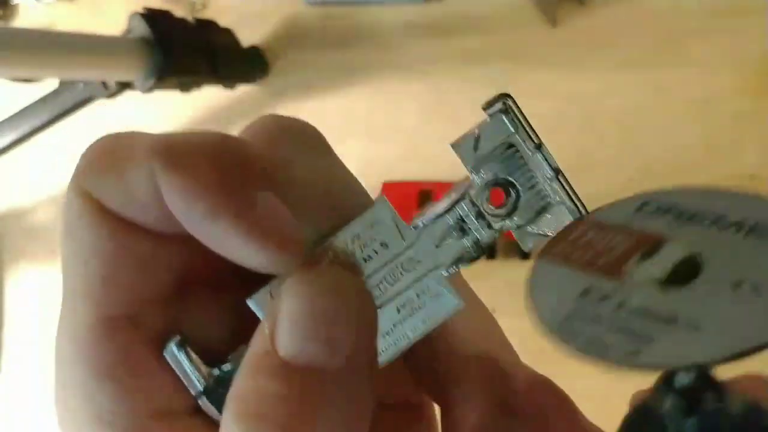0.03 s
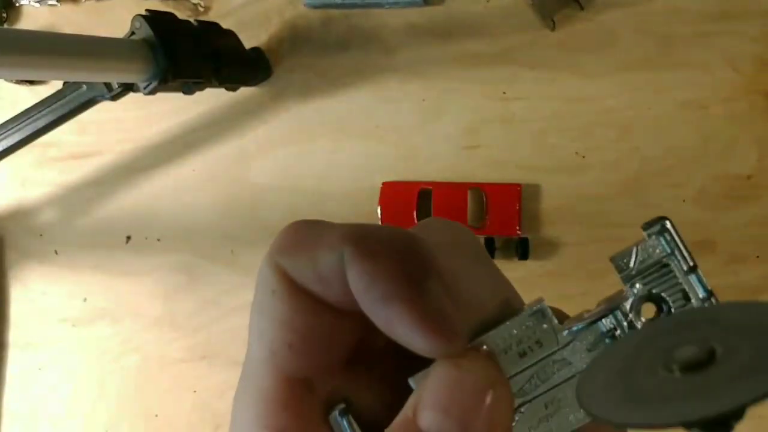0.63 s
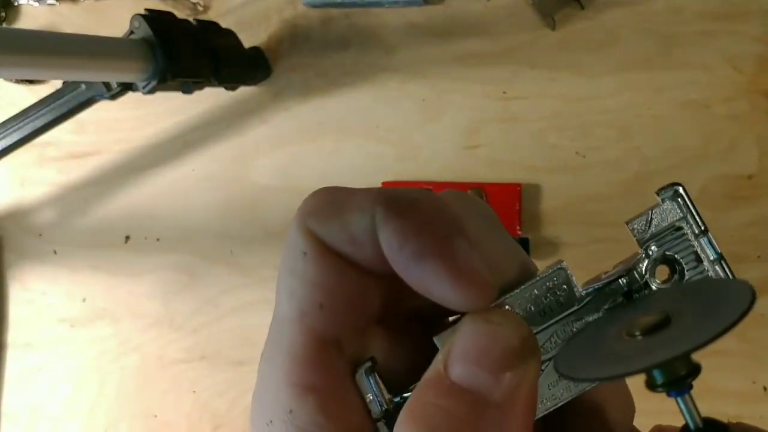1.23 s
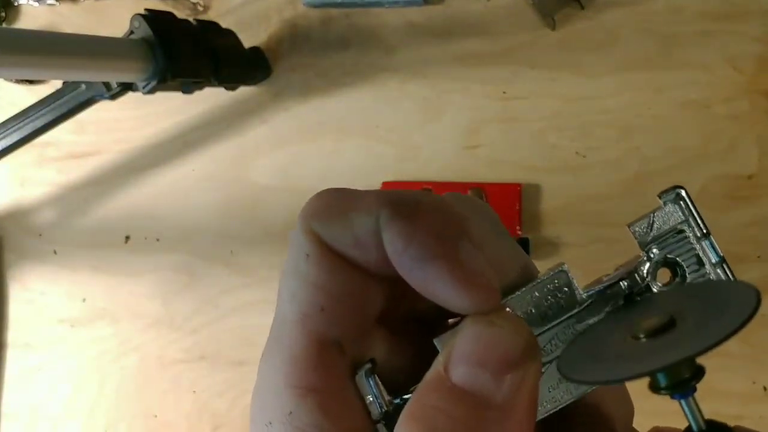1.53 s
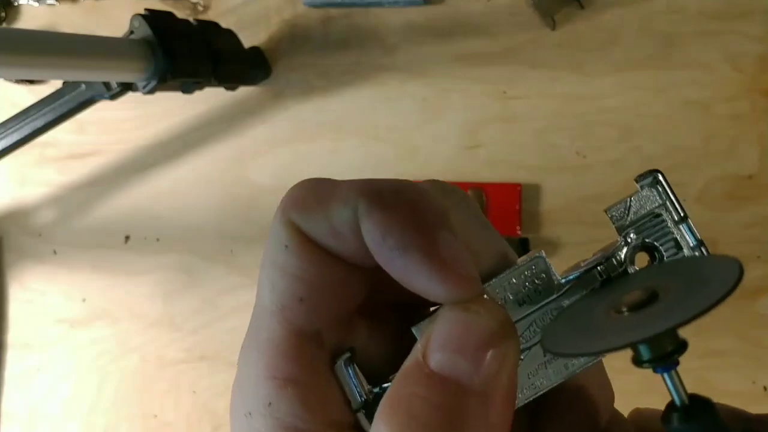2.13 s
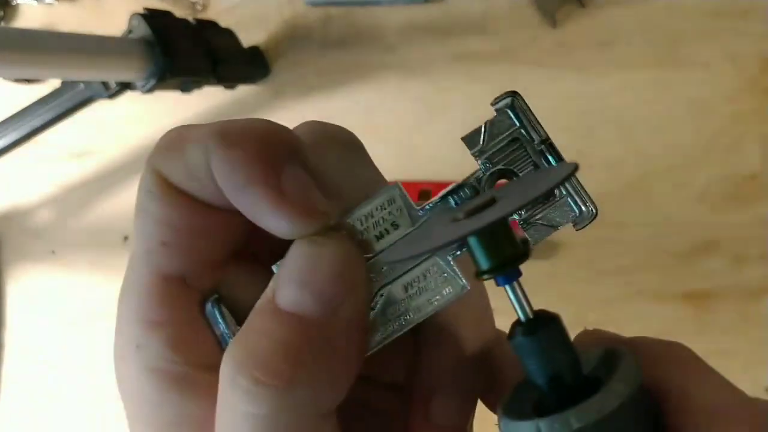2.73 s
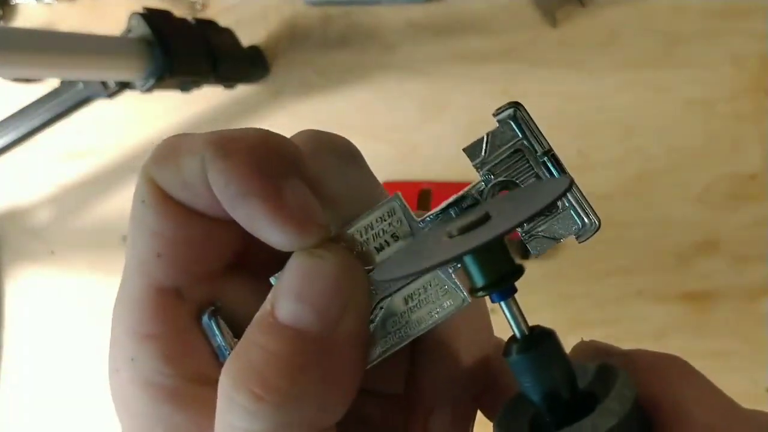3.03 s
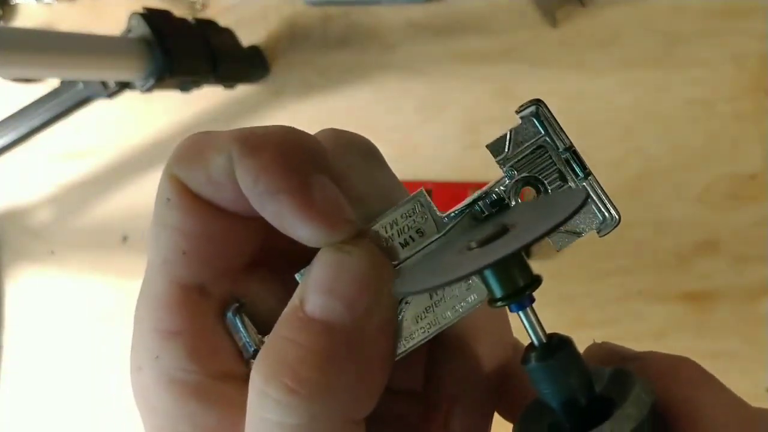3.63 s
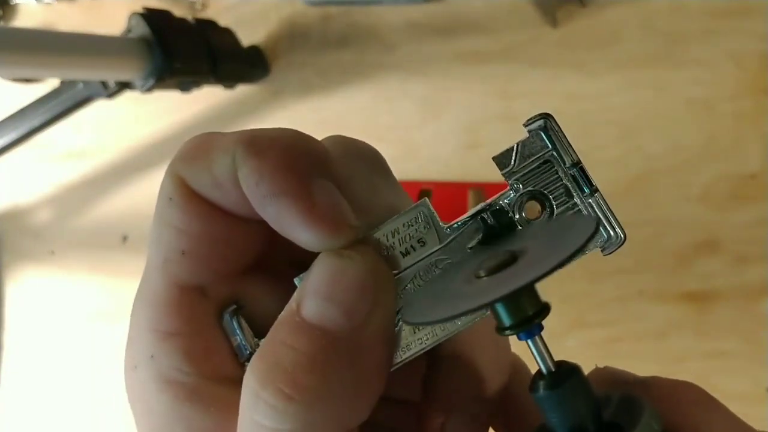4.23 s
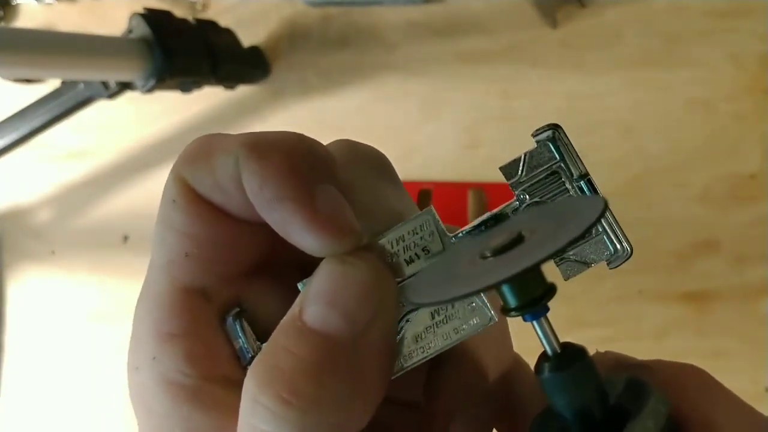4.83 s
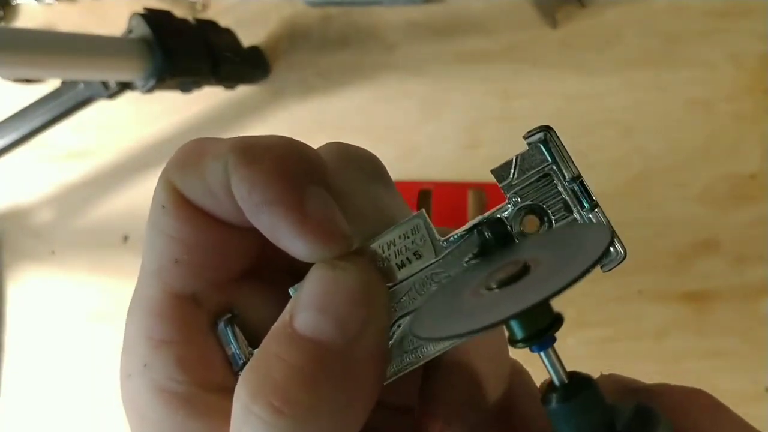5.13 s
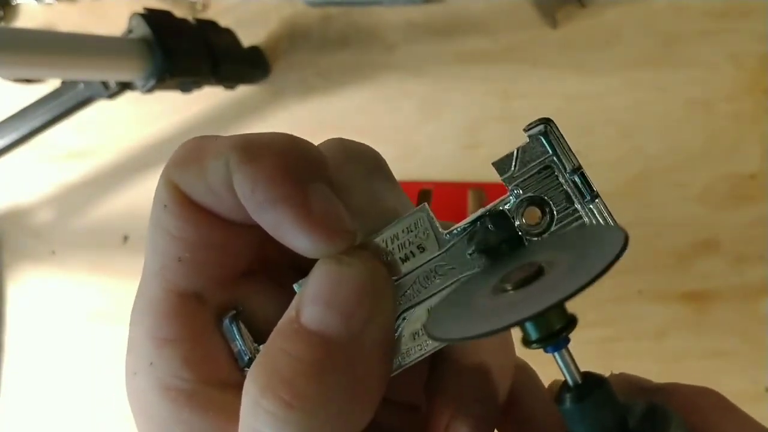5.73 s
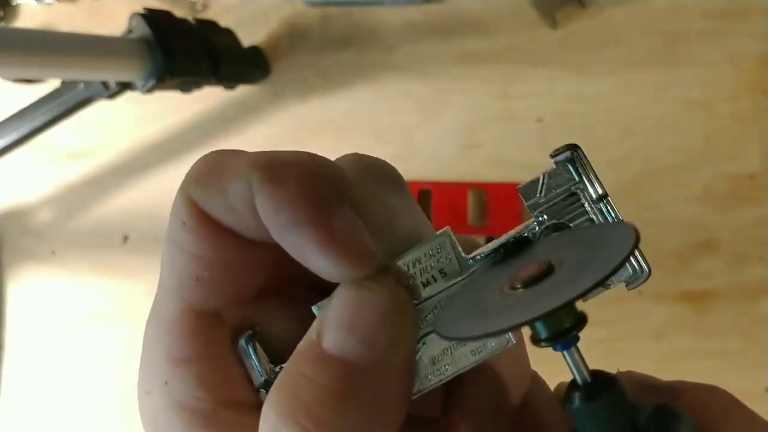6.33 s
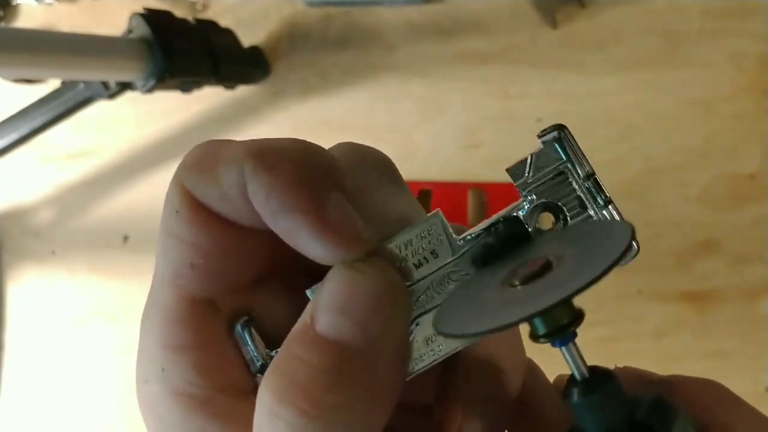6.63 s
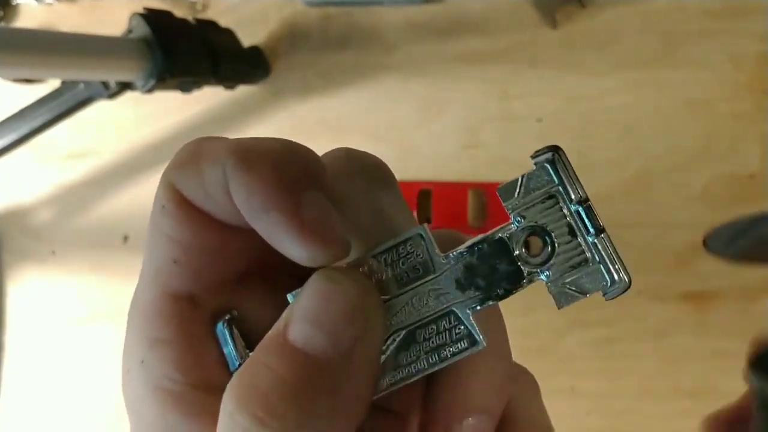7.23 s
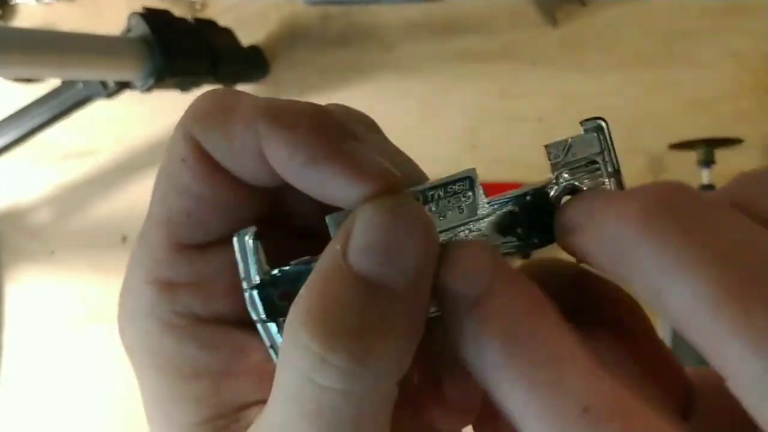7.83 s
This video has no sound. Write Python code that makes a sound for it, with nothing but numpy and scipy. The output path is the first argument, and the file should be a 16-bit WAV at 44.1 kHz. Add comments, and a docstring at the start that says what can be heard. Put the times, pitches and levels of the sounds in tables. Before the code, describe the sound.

A quiet workshop with a faint low rumble is heard through a stereo microphone pair close to a wooden bench. At about 0.3 seconds a small rotary tool clicks on, gives a brief high whistle and spins up, settling by one second into a hum with a whine and an airy hiss. From about 1.3 seconds its cutting disc touches a plastic toy part in short, gritty rasps. From around 3 to 7 seconds the presses come longer and closer together, with sizzling, sharp scrapes and high squeals. The motor's pitch sags under each press, most deeply between 5 and 7 seconds, and the overall level keeps dipping abruptly and swelling back. The tool runs free for a moment, then clicks off at about 7.4 seconds and stops at once. A few quick knocks follow between 7.6 and 7.8 seconds as it is put down on the bench.

```python
"""A quiet workshop, a stereo microphone pair close to the wooden bench. A small rotary tool clicks on,
whistles briefly and spins up: its unbalance hums, its three poles whine, its brushes hiss.
The cutting disc is pressed again and again on a plastic toy part: the grit rasps, the rim sizzles,
the part squeals and the speed sags; the level keeps dipping and swelling back.
At last the tool is switched off and knocks down on the bench."""
import sys
import numpy as np
from scipy import signal
from scipy.fft import rfft, irfft
from scipy.io import wavfile
from scipy.ndimage import map_coordinates

SR = 44100
rng = np.random.default_rng(int(sys.argv[2]) if len(sys.argv) > 2 else 0)


def inscribe(sig):
    """Save sig as 16-bit PCM at rate SR to the path in sys.argv[1].

    A 1-D sig is mono; a 2-D sig holds one channel per row.
    Samples are clipped to [-1, 1] before scaling.
    """
    pcm = np.round(np.clip(np.atleast_2d(sig).T, -1, 1) * 32767)
    wavfile.write(sys.argv[1], SR, pcm.astype(np.int16))


N = 352800
T = np.arange(N) / SR
HZ = np.fft.rfftfreq(N, 1 / SR)
ON_S, OFF_S, FREE_SPEED_HZ = .315, 7.38, 375.2

# room tone of the workshop: (frequency [Hz], level [dB])
ROOM_TONE = [(18, -52), (30, -20.5), (112, -13), (245, -3.5), (345, 0), (384, -3), (512, -2), (740, -5),
             (913, -11.5), (1350, -16.5), (2170, -33.5), (3100, -33.5), (4300, -43), (5300, -41.5),
             (7100, -43.5), (7670, -36), (8400, -49), (16000, -48)]
# room tone unique to each microphone, against what both share: (frequency [Hz], level [dB])
ROOM_SPREAD = [(100, 10.0), (400, 3), (1200, 3.5), (3000, 11.5)]
# how far the left microphone leads the right: (frequency [Hz], phase [rad])
LEFT_LEAD = [(1400, 0), (2200, 3.1), (2900, 5.5), (3700, 6.7), (4400, 9), (5400, 11.4), (7000, 15.7),
             (10600, 26), (13000, 31.6), (14100, 34.5), (15300, 38.5)]
# left microphone against the right: (frequency [Hz], level [dB])
LEFT_BALANCE = [(120, 7), (200, 8), (350, 9), (520, 3.5), (1150, 0), (1900, -5.5), (2800, 1.5), (4400, 0),
                (7300, 4.5), (10000, 5.5), (15000, -3)]
# abrupt dips in level, mostly at a hard bite: (time [s], depth [dB])
LEVEL_DIPS = [(0.743, -20), (1.337, -12), (1.403, -18.5), (1.649, -20), (2.023, -15), (2.13, -16.5),
              (2.48, -15.5), (2.905, -12), (3.0, -13), (3.24, -14), (3.419, -15.5), (3.689, -17.5),
              (3.869, -18.5), (4.225, -15.0), (4.441, -12), (4.629, -15.5), (4.78, -15), (5.09, -18),
              (5.199, -16), (5.349, -14.5), (5.6, -17.5), (5.87, -16.5), (6.03, -14.5), (6.169, -13),
              (6.32, -12.5), (6.46, -11.5), (6.58, -10.5), (6.759, -13), (6.965, -20.5)]
# switch clicks and knocks on the bench: (time [s], ring [dB], click [dB], thud [dB])
BLOWS = [(0.236, -64, -36, -68), (0.3146, -35, -22.5, -52), (0.494, -22.5, -43, -53),
         (7.374, -22, -22.5, -48), (7.6242, -15.5, -29.5, -53), (7.688, -28, -24, -32.5),
         (7.693, -14, -30, -44), (7.769, -15.5, -36, -33), (7.774, -31, -33.5, -41)]
# modes of the struck housing: (frequency [Hz], level [dB], t60 [s])
HOUSING_MODES = [(1035, 0, 0.017), (1190, -24, 0.048), (794, -25, 0.031), (3500, -42, .025)]
# dry click of a blow: (frequency [Hz], level [dB])
CLICK_SPECTRUM = [(150, -37), (700, -33), (1100, 7), (1900, 9.5), (3100, 7.5), (4300, -3), (5400, 1.5),
                  (7000, -8.5), (16000, -20)]
# dull thud of the bench: (frequency [Hz], level [dB])
THUD_SPECTRUM = [(40, -22), (70, -14), (120, -6.5), (260, -4), (650, -11.0), (1500, -21), (5000, -47)]
# the motor starts: (time [s], brush scrape [dB], speed control whistle [dB], commutator chirp [dB])
START_LEVELS = [(.315, -70, -80, -95), (.325, -57.5, -51, -92), (.42, -48.5, -56, -70),
                (.455, -42.5, -51, -64), (.5, -51, -48, -52), (.55, -65, -52, -65), (.6, -52, -52, -50),
                (.66, -43, -55, -59), (.745, -62, -93, -72)]
# lines of the motor's hum: (multiple of shaft speed, level [dB])
HUM_LINES = [(1, 1.5), (2, -16.5), (4, -13.5), (5, -13.5), (6, -7), (7, -10), (9, -9), (10, -13.5),
             (12, -16.5), (15, -35), (18, -10.5), (21, -11), (22, -21), (23, -31), (24, -10), (27, -14.5),
             (30, -11.5), (33, -13.5), (36, -19), (40, -40), (42, -34)]
# casing resonances that lift a line sweeping through: (frequency [Hz], width [Hz], lift [dB])
CASING_RESONANCES = [(740, 70, 6), (1590, 130, 11), (2235, 70, 6), (3150, 160, 5), (3355, 70, 8),
                     (4485, 90, 22), (7840, 200, 5), (8950, 130, 4), (13420, 220, 11)]
# the housing's response to the whine of the poles: (frequency [Hz], level [dB])
WHINE_RESPONSE = [(600, -65.5), (850, -49), (920, -46.5), (960, -41.5), (1020, -34.5), (1070, -36.5),
                  (1120, -35.5)]
# brushes and cooling air: (frequency [Hz], level [dB])
BRUSH_SPECTRUM = [(60, -30), (280, -37), (500, -23.5), (750, -9), (1100, -1), (1800, -10), (2700, -1.5),
                  (3400, -8), (4200, -9), (5500, -8.5), (7300, -14), (8400, -10.5), (9600, -20.5),
                  (16000, -18.5)]
# the rim catches an edge: (time [s], length [s], scrape [dB], screech [dB])
EDGE_CATCHES = [(1.391, 0.031, -32, -55), (1.567, 0.066, -38, -55), (1.821, 0.019, -33, -50),
                (2.006, 0.047, -29.5, -49), (2.107, 0.024, -27.5, -50), (2.264, 0.019, -32, -53),
                (2.476, .015, -30.5, -52), (2.558, 0.025, -26.5, -55), (2.612, 0.02, -30.5, -55),
                (2.995, .019, -25, -30.5), (3.095, 0.016, -36, -32.5), (3.15, 0.013, -44, -33),
                (3.244, 0.011, -27, -35), (3.297, 0.029, -35, -32), (3.418, 0.015, -42, -29),
                (3.515, 0.02, -36, -36), (3.639, .018, -29, -48), (3.843, 0.056, -32, -32),
                (4.218, 0.021, -32, -44), (4.326, 0.028, -43, -34), (4.739, 0.017, -30.5, -31),
                (4.784, 0.046, -30, -31), (4.825, .03, -31, -46), (5.556, 0.02, -44, -31),
                (6.229, 0.022, -41, -32), (6.302, 0.019, -32, -40), (6.654, 0.021, -42, -43),
                (6.758, 0.023, -28.5, -29.5), (6.968, 0.028, -23.5, -45)]
# scrape of a caught edge: (frequency [Hz], level [dB])
SNAG_SPECTRUM = [(100, -38), (350, -5), (600, -19), (1000, -8), (2300, -8), (4300, -13), (5300, -6.5),
                 (6800, -3.5), (9000, -2.5), (10600, -13), (16000, -4.5)]
# the part's strongest resonance: (frequency [Hz], level [dB])
SQUEAL_SPECTRUM = [(3000, -61), (4500, -10), (5000, -7.5), (5350, -2), (5700, -14.5), (6200, -21.5),
                   (7000, -7), (9000, -46)]
# the plastic part under the disc: (frequency [Hz], level [dB])
PLASTIC_SPECTRUM = [(200, -33), (650, -26.5), (980, -1.5), (1300, -10.5), (1620, -8), (2300, -11),
                    (4600, -14), (5300, -3.5), (6100, -11.5), (7400, -1.5), (9600, -20), (10600, -5.5),
                    (11700, -17.5), (16000, -22.5)]
# ring of the disc's rim: (frequency [Hz], level [dB])
RIM_SPECTRUM = [(300, -103), (9000, -18.5), (12500, -24.5), (13400, -19.5), (14000, -56), (14500, -15.5),
                (15300, -8), (15800, -19), (17000, -28)]
# the disc is pressed on the part; load is the sag in speed it would settle at:
# (time [s], length [s], load [Hz], rasp [dB], squeal [dB], sizzle [dB])
DISC_PRESSES = [(1.336, 0.135, 13, -33.5, -51, -34), (1.572, 0.095, 40.4, -32, -55, -27),
                (1.817, 0.115, 14.6, -37.5, -39.5, -40.5), (1.967, 0.075, 54.4, -38, -49, -38),
                (2.098, 0.095, 24, -34, -51, -46), (2.252, 0.05, 16, -43, -62, -44),
                (2.557, 0.075, 19.4, -41, -58, -45), (2.903, 0.26, 24.3, -35.5, -36.5, -37),
                (3.19, 0.1, 17.5, -40.5, -46, -48), (3.351, 0.33, 27.3, -41.5, -39.5, -38.5),
                (3.7, 0.11, 30, -30, -43, -36), (3.815, 0.1, 44.6, -29, -35, -40),
                (4.213, 0.26, 36.3, -36.5, -32, -36.5), (4.488, 0.23, 27.4, -38, -44, -34.5),
                (4.747, 0.12, 26, -31.5, -34, -39), (5.085, 0.205, 77, -28.5, -30, -30),
                (5.285, 0.075, 31.7, -33, -37.5, -46), (5.553, 0.165, 71, -33, -35, -32.5),
                (5.731, 0.17, 72, -31.5, -39, -35), (5.9, 0.11, 40.4, -32, -42, -34.5),
                (6.072, 0.12, 17.5, -35, -43, -44), (6.208, 0.22, 81, -33.5, -41.5, -43),
                (6.448, 0.13, 67, -31.5, -45, -40), (6.599, 0.16, 76, -33.5, -39, -45),
                (6.782, 0.2, 55, -31.5, -41, -43), (6.99, 0.06, 28.5, -33, -51, -44)]


def amp(db):
    """Decibels to gain."""
    return 10 ** (np.asarray(db) / 20)


def unit(x):
    """Scales to rms 1."""
    return x / np.sqrt(np.mean(x ** 2) + 1e-20)


def curve(points):
    """A table over frequency, joined on a log axis."""
    hz, value = np.transpose(points)
    return np.interp(np.log(HZ + 1), np.log(hz + 1), value)


def colour(x, spectrum):
    """Gives x a spectrum, at rms 1."""
    return unit(irfft(rfft(x) * amp(curve(spectrum)), N))


def wander(rate_hz):
    """Random drift of rms 1, up to about the given rate."""
    return unit(irfft(rfft(rng.standard_normal(N)) / (1 + (HZ / rate_hz) ** 4), N))


def lag(x, seconds):
    """Follows x with the given time constant."""
    pole = np.exp(-1 / (seconds * SR))
    return signal.lfilter([1 - pole], [1, -pole], x)


def room_tone(level_db=-55):
    """Soft steady rumble of the workshop, most alike at the two microphones in its middle range."""
    shared = colour(rng.standard_normal(N), ROOM_TONE)
    sides = np.array([colour(rng.standard_normal(N), ROOM_TONE) for _ in range(2)])
    sides = irfft(rfft(sides) * amp(curve(ROOM_SPREAD)), N)
    return amp(level_db) * unit(shared + sides)


def reflections(x, t60=0.13, low_db=-17, high_db=-4):
    """Short scattered echoes from the bench and nearby walls, strongest in the treble."""
    t = np.arange(SR // 3) / SR
    taps = rng.standard_normal((2, len(t))) * (rng.random((2, len(t))) < .1)
    taps *= amp(-60 * t / t60) * (t > .002)
    taps /= np.linalg.norm(taps, axis=1, keepdims=True)
    sent = irfft(rfft(x) * amp(curve([(1100, low_db), (5000, high_db)])), N)
    return signal.fftconvolve(sent[None], taps, axes=1)[:, :N]


def microphone_pair(x):
    """Direct sound at close range: the treble reaches the left side first; the hum is louder there."""
    left, lead = amp(curve(LEFT_BALANCE) / 2), np.exp(.5j * curve(LEFT_LEAD))
    pair = np.array([left * lead, 1 / (left * lead)]) / np.sqrt((left ** 2 + left ** -2) / 2)
    return irfft(rfft(x) * pair, N)


def level_dips(load, fall_s=0.0047, recovery_s=0.92, creep_db_per_s=11.5, load_hold=0.46):
    """The level drops at each dip and swells back, at the given pace while the disc runs free."""
    times, depth_db = np.transpose(LEVEL_DIPS)
    latest = np.maximum(np.searchsorted(times, T) - 1, 0)
    clock = np.cumsum(1 - load_hold * load / load.max()) / SR  # load slows the return
    since = abs(clock - np.interp(times, T, clock)[latest])
    db = np.minimum(depth_db[latest] * np.exp(-since / recovery_s) + creep_db_per_s * since, 0)
    return amp(lag((T > times[0]) * db, fall_s))


def knocks(click_t60=0.019, thud_t60=0.11, rise_s=0.0014):
    """Each blow rings the housing, with a dry click and a dull thud of the bench."""
    t = np.arange(SR // 5) / SR
    ring = sum(amp(db - 60 * t / t60) * np.sin(2 * np.pi * hz * t) for hz, db, t60 in HOUSING_MODES)
    crack = colour(rng.standard_normal(N), CLICK_SPECTRUM)
    wood = colour(rng.standard_normal(N), THUD_SPECTRUM)
    out = np.zeros(N)
    for start, ring_db, click_db, thud_db in BLOWS:
        span = slice(round(start * SR), round(start * SR) + len(t))
        click = .5 * crack[span] * amp(click_db - 60 * t / click_t60)
        thud = .5 * wood[span] * amp(thud_db - 60 * t / thud_t60)
        out[span] += (amp(ring_db) * ring + click + thud) * (1 - np.exp(-t / rise_s))
    return out


def shaft_turns(load, spin_up_s=.147, inertia_s=.186, flutter=0.0014, load_flutter=.0015):
    """The shaft spins up from rest and sags under load, less steadily the harder it works."""
    free = FREE_SPEED_HZ * (1 - np.exp(-np.maximum(T - ON_S, 0) / spin_up_s))
    sag = lag(load, inertia_s)
    unsteady = 1 + flutter * wander(43) + load_flutter * sag / sag.max() * wander(17)
    return np.cumsum((free - sag) * unsteady) / SR


def motor_start(turns, whistle_hz=7997, spread_hz=22, segments=12, fade_s=0.0052):
    """During spin-up the speed control whistles, the brushes scrape and the commutator chirps upward."""
    times, *columns = np.transpose(START_LEVELS)
    outside_s = np.maximum(np.maximum(times[0] - T, T - times[-1]), 0)
    scrape, whistle, chirp = [amp(np.interp(T, times, db)) for db in columns]
    control = np.sin(2 * np.pi * np.cumsum(whistle_hz + spread_hz * wander(115)) / SR)
    commutator = np.sin(2 * np.pi * segments * turns + 0.47 * wander(100))
    brushes = colour(rng.standard_normal(N) * amp(2 * wander(130)), BRUSH_SPECTRUM)
    tones = np.sqrt(2) * (whistle * control + chirp * commutator)
    return (scrape * brushes + tones) * np.exp(-outside_s / fade_s)


def unbalance_hum(turns, speed, load, level_db=-41, stutter_db=2.2, onset_hz=238, onset_range_hz=6):
    """Unbalance shakes the casing once a turn; the harmonics sweep through its resonances."""
    angle = 2 * np.pi * turns + 0.037 * wander(100)  # play in the bearings blurs the high lines
    lines = np.zeros(N)
    for k, db in HUM_LINES:
        lift = sum(up / (1 + (2 * (k * speed - hz) / width) ** 2) for hz, width, up in CASING_RESONANCES)
        shimmer = 2.5 * min(k / 20, 1) ** 2 * wander(28)
        droop = 70 * (1 - speed / speed.max()) * np.clip(k / 10 - 1, 0, 1)  # high lines need full speed
        lines += amp(db + lift + shimmer - droop) * np.cos(k * angle + 2 * np.pi * rng.random())
    stutter = stutter_db * load / load.max() * wander(30)  # the disc catches and frees itself
    onset = .5 + .5 * np.tanh((speed - onset_hz) / onset_range_hz)
    return amp(level_db + stutter) * onset * lines


def pole_whine(poles, speed, load, strain_s=0.15, db_per_load_hz=0.0952, shimmer_db=3.0):
    """The three poles whine through the housing, louder and less steadily under load."""
    response_db = np.interp(3 * speed, *np.transpose(WHINE_RESPONSE))
    effort = lag(load, strain_s)
    strain_db = db_per_load_hz * effort + shimmer_db * effort / effort.max() * wander(38)
    return amp(response_db + strain_db) * poles


def motor(turns, load, hiss_db=-36.5, sparking=0.45, stop_s=0.0024):
    """Hum, whine and brush hiss chopped by the poles, all dying at switch-off."""
    speed = np.gradient(turns) * SR
    powered = np.exp(-np.clip(T - OFF_S, 0, 1) / stop_s) * (T > ON_S)
    drive = (abs(speed) / FREE_SPEED_HZ) ** 2.93  # hum and hiss grow steeply with speed
    poles = np.cos(2 * np.pi * 3 * turns)
    hum = drive * unbalance_hum(turns, speed, load)
    whine = pole_whine(poles, speed, load)
    brushes = rng.standard_normal(N) * (1 + sparking * poles) * amp(wander(83))
    hiss = amp(hiss_db) * drive * colour(brushes, BRUSH_SPECTRUM)
    return powered * (np.sqrt(2) * (hum + whine) + hiss)


def grit(turns, memory, grains=128):
    """The same grit comes round on each turn, changed by wear: fuzzy lines at every multiple."""
    rim = rng.standard_normal((N // 100, grains))  # one row a turn
    rim = signal.lfilter([1], [1, -memory], rim, axis=0)
    return unit(map_coordinates(rim.ravel(), [turns * grains], order=3, mode="wrap"))


def snags(turns, ramp_s=0.0021, wobble=0.56):
    """The rim catches an edge of the part for a few turns: hard scrapes that may make it screech."""
    gates = np.array([np.clip(np.minimum(T - start, start + length - T) / ramp_s, 0, 1)
                      for start, length, *_ in EDGE_CATCHES])
    scrape_gain, screech_gain = amp(np.array(EDGE_CATCHES)[:, 2:]).T @ gates
    bite = np.exp(wobble * np.cos(2 * np.pi * turns))
    scrape = colour(grit(turns, memory=0.11) * bite, SNAG_SPECTRUM)
    screech = colour(grit(turns, memory=0.37) * bite, SQUEAL_SPECTRUM)
    return scrape_gain * scrape + screech_gain * screech


def squealing(turns, blur_rad=.62):
    """The part slips in step with the disc: even, slightly blurred lines round its resonance."""
    lines = sum(np.cos(2 * np.pi * (k * turns + rng.random()) + blur_rad * wander(70))
                for k in range(12, 25))
    return colour(lines, SQUEAL_SPECTRUM)


def disc_contacts(grip_s=.009, release_s=.006):
    """One envelope for each press: quick grip, hold, quick release."""
    return np.array([
        np.clip((T - start) / grip_s, 0, 1) * np.exp(-np.clip(T - start - length, 0, 1) / release_s)
        for start, length, *_ in DISC_PRESSES])


def grinding(turns, contact, chatter_db=1.5, skip_db=1.6):
    """The disc runs out of true and bites once a turn; the hand-held part chatters against it."""
    rasp_gain, squeal_gain, sizzle_gain = amp(np.array(DISC_PRESSES)[:, 3:]).T @ contact
    bite = np.cos(2 * np.pi * turns)
    # the part skips between firm and light contact
    chatter = amp(chatter_db * wander(42) + skip_db * np.tanh(4 * wander(22)))
    scratch = grit(turns, memory=0.62) * np.exp(0.29 * bite) * chatter * amp(4.0 * wander(470))
    skid = grit(turns, memory=0.66) * np.exp(bite) * chatter * amp(3.5 * wander(47))
    rasp, sizzle = colour(scratch, PLASTIC_SPECTRUM), colour(skid, RIM_SPECTRUM)
    squeal = unit(squealing(turns) * chatter)
    return rasp_gain * rasp + squeal_gain * squeal + sizzle_gain * sizzle


def scene():
    """Close up, the tool grinds the plastic and knocks down; the workshop lies quiet behind it."""
    contact = disc_contacts()
    load = np.array(DISC_PRESSES)[:, 2] @ contact
    turns, dips = shaft_turns(load), level_dips(load)
    running = motor(turns, load) + motor_start(turns) + grinding(turns, contact) + snags(turns)
    tool = dips * running + knocks()
    return microphone_pair(tool) + reflections(tool) + dips * room_tone()


def record(dry, cutoff_hz=15900):
    """Both channels lose their highest treble above a steep edge."""
    lowpass = signal.firwin(511, cutoff_hz, window=("kaiser", 9), fs=SR)
    return signal.oaconvolve(dry, lowpass[None], "same")


dry = scene()
out = record(dry)
inscribe(out)
```